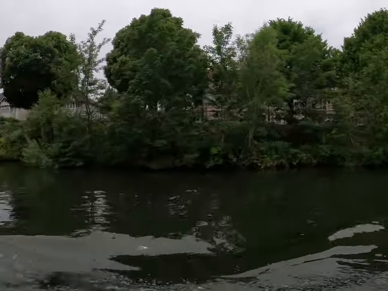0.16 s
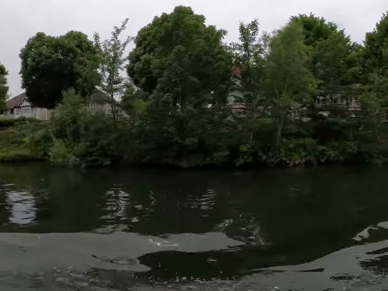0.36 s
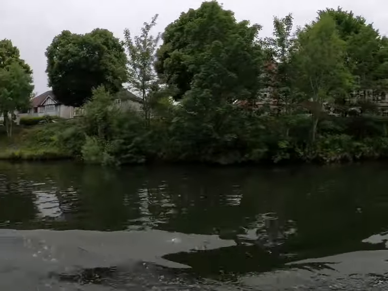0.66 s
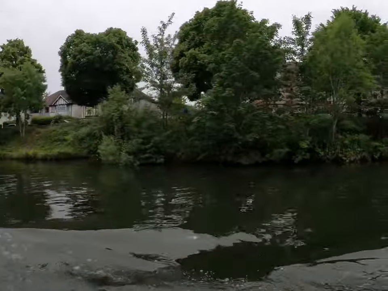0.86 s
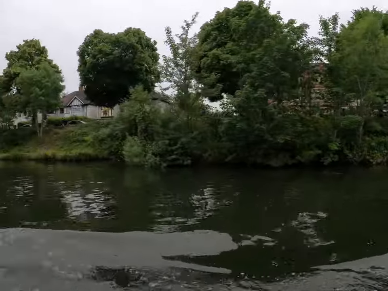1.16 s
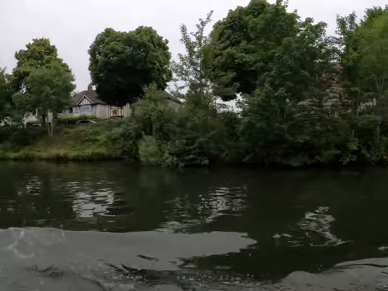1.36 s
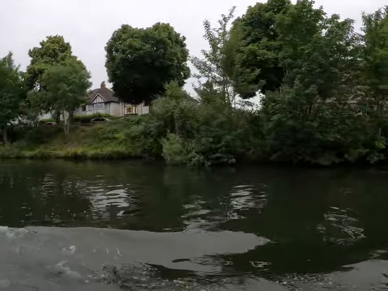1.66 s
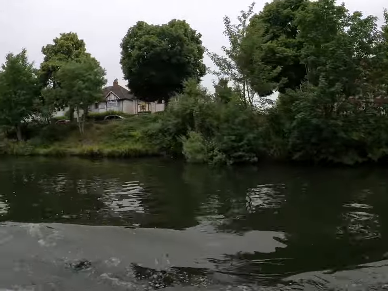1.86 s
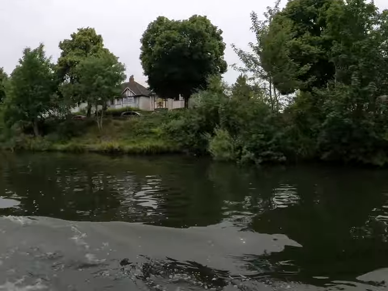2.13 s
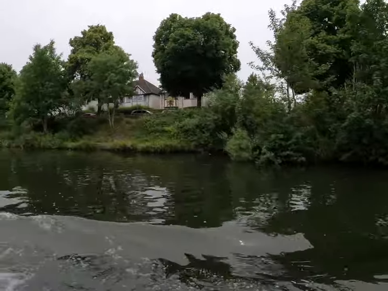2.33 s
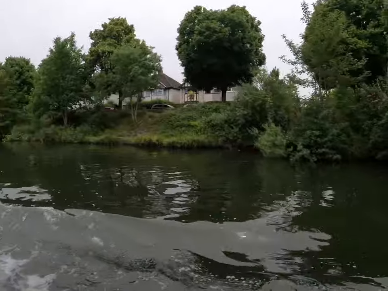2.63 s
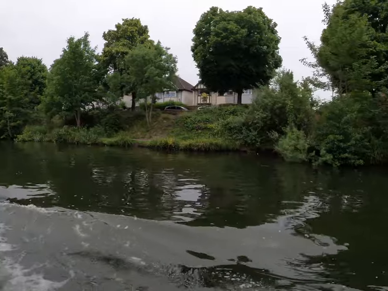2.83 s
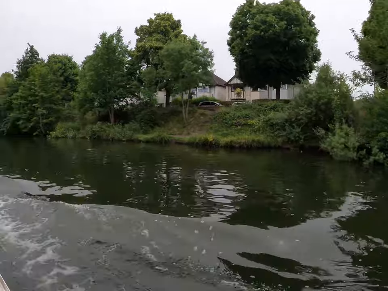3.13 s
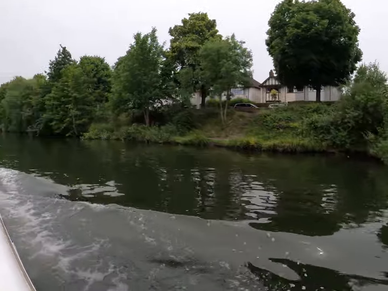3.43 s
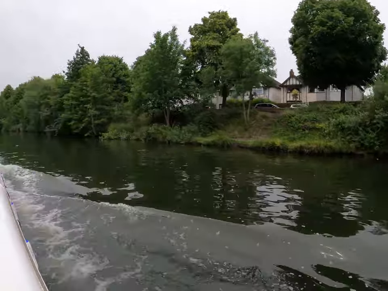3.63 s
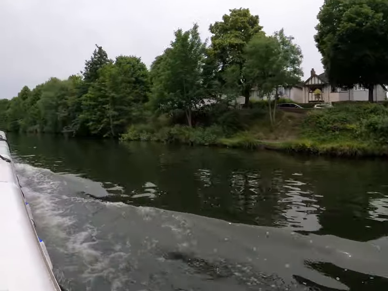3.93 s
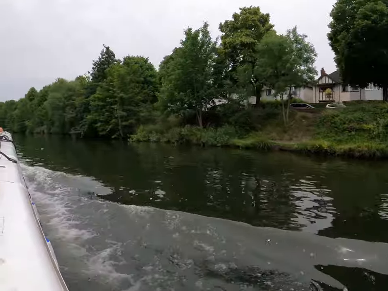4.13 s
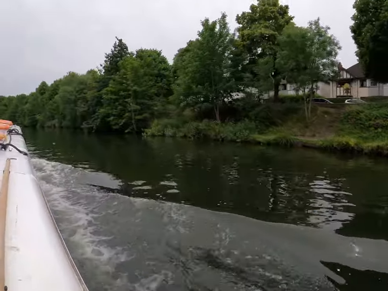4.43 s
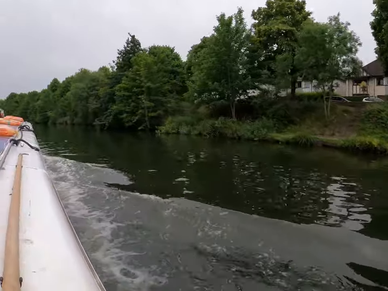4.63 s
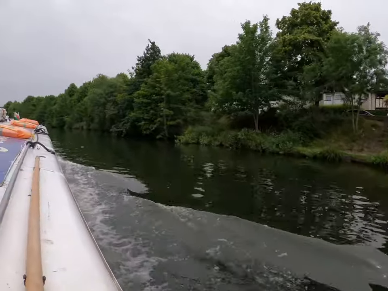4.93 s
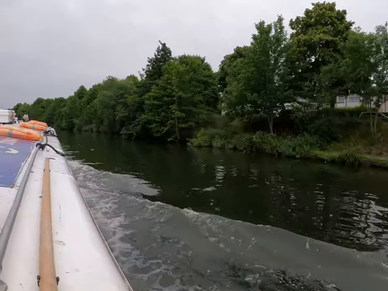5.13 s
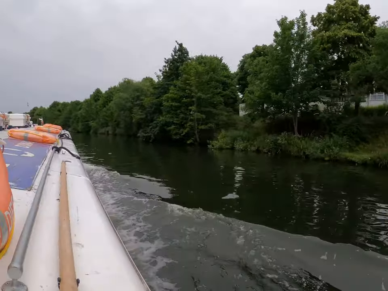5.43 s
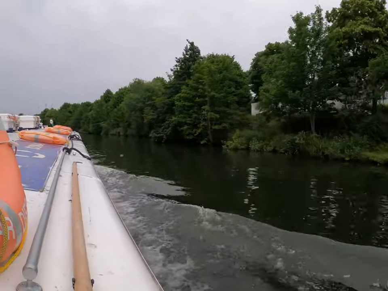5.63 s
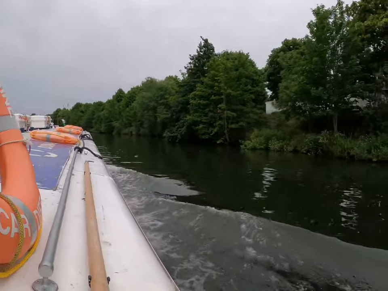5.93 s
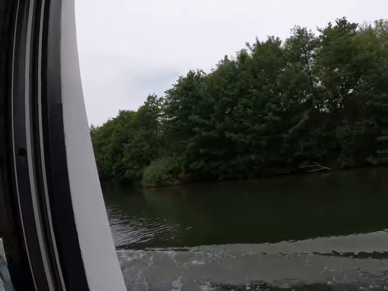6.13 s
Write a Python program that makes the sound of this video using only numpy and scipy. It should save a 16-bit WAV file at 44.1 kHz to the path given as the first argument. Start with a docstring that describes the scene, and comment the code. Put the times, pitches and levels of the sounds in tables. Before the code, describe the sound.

A boat diesel hums deep and steady on a river while wind buffets the microphone early on and the wake hisses softly past the hull.

```python
"""A four-cylinder boat diesel hums at steady speed on a calm river: cosines on multiples of its cycle.
Gear and block tones whine over the firing tone; engine roar is noise throbbing with firing and cycle.
The wake is lumpy noise plus ringing bubbles; soft swells and drops are short bands of noise.
Wind rumbles, flutters and buffets as enveloped noise; the deck drums as steady low noise.
The microphone turns from the bank to the stern, which shifts gear, wake and roar levels."""
import sys
import numpy as np
from scipy import signal
from scipy.fft import rfft, irfft
from scipy.io import wavfile
from scipy.ndimage import uniform_filter1d

SR = 44100
rng = np.random.default_rng(int(sys.argv[2]) if len(sys.argv) > 2 else 0)


def bounce(signal):
    """Save signal as a 16-bit WAV file at the path given by the first command-line argument."""
    frames = np.transpose(np.atleast_2d(signal))
    limited = np.clip(frames, -1, 1)
    pcm = np.round(limited * 32767).astype(np.int16)
    wavfile.write(sys.argv[1], SR, pcm)


def to_linear_factor(level_db):
    """Convert decibel levels (scalar or array-like) to linear amplitude factors."""
    exponent = np.asarray(level_db, float) / 20
    return 10 ** exponent


N = 276990
STOP_S = 6.0583

# deck drumming: f/Hz, density/dB (all spectra are relative; the noise is scaled to rms 1)
HULL_SPECTRUM = [(12, -14.5), (30, 0), (60, -6.5), (110, -6.5), (180, -15.5), (300, -28)]
# wind and buffet rumble: f/Hz, density/dB
RUMBLE_SPECTRUM = [(12, -10), (25, 1), (50, -0.5), (90, 4), (140, 0.5), (250, -31.5), (400, -50.5)]
# steady wind, duller than its gusts: f/Hz, density/dB
BREEZE_SPECTRUM = [(60, -30.5), (110, -2.5), (170, -1.5), (240, -2.5), (330, -6), (500, -16), (900, -28),
                   (1500, -41), (2500, -61)]
# buffet flutter: f/Hz, density/dB
FLUTTER_SPECTRUM = [(60, -30), (110, -4), (200, -0.5), (320, -2.5), (500, -13.5), (900, -26), (1500, -39.5),
                    (2500, -63)]
# buffet rasp: f/Hz, density/dB
RASP_SPECTRUM = [(250, -19), (400, 10), (700, 7), (1100, -2.5), (1500, -15), (2000, -28.5), (2800, -56)]
# splashes in the wake: f/Hz, density/dB
SPLASH_SPECTRUM = [(900, -29), (1500, -5.5), (2200, -3.5), (2800, -6), (3600, -14.5), (5000, -24.5),
                   (7000, -38.5)]
# fine foam: f/Hz, density/dB
FOAM_SPECTRUM = [(2500, -16), (3600, -3.5), (4500, -3), (6000, -7), (7500, -10.5), (9000, -15.5),
                 (11000, -25), (14000, -51)]
# rough engine and exhaust noise: f/Hz, density/dB
ROAR_SPECTRUM = [(150, -20.5), (300, -14.5), (420, 1), (520, -4.5), (600, -7.5), (700, -4), (800, -6),
                 (1000, -8.5), (1300, -11.5), (1800, -20), (3000, -42.5)]
# microphone hiss: f/Hz, density/dB
MIC_SPECTRUM = [(5000, -22.5), (7500, -6.5), (8500, -2.5), (10000, -14.5), (12000, -21.5), (15500, -38)]
HULL_DB, MIC_HISS_DB = -33, -70

# microphone direction: t/s, heading (0 bank to 1 stern)
HEADING = [(0, 0.0091), (2.9, 0.065), (3.5, 0.29), (4.1, 0.35), (4.45, 0.52), (4.95, 0.94), (6.1, 0.99)]
SIDE_HEADING = 0.4  # facing along the side
# swell shared by wake, roar and gear, before each one's share: t/s, level/dB
SWELL_DB = [(0, -3), (.12, 0.5), (.45, 0.5), (.68, 2), (1.0, 0.5), (1.35, -1), (1.7, 1.5), (2.65, 2),
            (3.0, 0.9), (3.45, -2), (4.75, -2), (4.95, 3), (5.15, 2.1), (5.6, 1.5), (5.85, 0), (6.05, 1.5)]
GEAR_SHARE, SPLASH_SHARE, FOAM_SHARE, ROAR_SHARE = 0.47, 0.98, 0.9, 1.2
SPLASH_DB, FOAM_DB, ROAR_DB = -50, -60.5, -38.5  # base levels
SPLASH_STERN_DB, FOAM_STERN_DB, ROAR_STERN_DB = -3, -0.3, -1.36  # change when facing the stern

# wind on the microphone: t/s, rumble level/dB, flutter level/dB
WIND_DB = [(0, -17.5, -28), (.1, -28, -25.5), (.28, -18.5, -21.5), (.36, -28.5, -31.5), (.5, -31.5, -30.5),
           (.6, -30, -31), (.8, -24, -28.5), (1.05, -21, -24), (1.25, -25, -43), (1.55, -24.5, -33),
           (1.9, -30.5, -37.5), (2.6, -41, -31), (3.2, -48, -31), (3.9, -27, -32.5), (4.4, -29, -38),
           (4.9, -34.5, -33), (5.3, -30.5, -36), (6.05, -29, -40)]
# stronger wind is lumpier
RUMBLE_CALM_DB, LUMPS_CALM_DB, LUMPS_DB_PER_DB = -44, 0.4, 0.09
# wind buffets: t/s, thump level/dB, flutter level/dB, rasp level/dB, length/s
BUFFETS = [(0.089, -40.5, -20.5, -31.5, 0.017), (0.113, -48.5, -23.5, -26, 0.035),
           (0.154, -50, -26, -29, 0.048), (0.196, -22, -19.5, -32.5, 0.042),
           (0.248, -26.5, -25.5, -24, 0.017), (0.267, -31, -16, -21, 0.013), (0.288, -32, -19, -27, 0.042),
           (0.349, -46, -38, -24.5, 0.013), (0.373, -52.5, -33.5, -32, 0.031),
           (0.648, -12, -12, -37, 0.0053), (0.661, -30, -15.5, -42, 0.011),
           (0.719, -40, -17.5, -19.5, 0.012), (0.741, -44, -21, -37, 0.008),
           (0.782, -27, -21.5, -25, 0.016), (0.816, -40, -16.5, -31, 0.013),
           (0.839, -40.5, -16.5, -30, 0.012), (0.854, -37, -23, -29, 0.0089), (0.901, -37, -19, -33, 0.021),
           (0.919, -24, -19, -34, 0.0068), (0.926, -30, -28.5, -18.5, 0.007),
           (0.984, -14.5, -17, -27, 0.019), (1.001, -20, -22, -39, 0.02), (1.034, -37, -24, -38, 0.013),
           (1.088, -35, -30, -41, 0.017), (1.125, -18.5, -22.5, -38, 0.017),
           (1.146, -22, -21.5, -39, 0.012), (1.201, -23, -17, -25, 0.012), (1.337, -50, -20, -33, 0.0071),
           (1.349, -53, -23, -25, 0.012), (1.53, -22.5, -53, -49, 0.011), (1.674, -30, -41, -47, 0.022),
           (1.77, -43, -23.5, -44, 0.018), (1.791, -37, -19, -26, 0.014), (1.835, -17, -32, -40, 0.074),
           (2.121, -35, -27, -32, 0.0156), (2.232, -46, -27.5, -32, 0.013), (2.327, -21.5, -27, -38, 0.046),
           (3.87, -35, -48, -54.5, 0.03), (4.342, -25, -56, -51, 0.066), (4.743, -25, -64, -57, 0.058),
           (4.869, -14.5, -26, -39, 0.02), (4.832, -15.5, -41, -48, 0.0098),
           (4.917, -13.5, -24, -39, 0.032), (5.676, -30, -39, -47, 0.03), (5.973, -45.5, -38, -33, 0.0086)]
DIP_FROM_DB, DIP_DB_PER_DB = -27, 0.29  # thumps above this level push the hum down
# further brief dips of the hum: t/s, depth/dB, length/s
DIPS = [(0.78, 4, .02), (0.98, 4, .02), (1.08, 5, .03), (1.12, 6, .025), (3.876, 6, .02), (4.36, 3, .025),
        (4.748, 4, .014), (4.92, 5, .018), (5.674, 12, .014)]

# soft swells of band noise, dull to bright, in wind and water: t/s, centre f/Hz, level/dB, length/s
SOFT_SWELLS = [(0.47, 2700, -59, 0.072), (0.668, 2800, -47, 0.06), (2.4, 2245, -53.5, 1),
               (5.8, 2100, -63, 0.26), (5.521, 3000, -54, 0.1), (5.597, 3200, -49.5, 0.03),
               (3.2, 3500, -60, 0.45), (5.05, 5500, -63.5, 0.4), (2.75, 8500, -70, 0.6),
               (4.89, 12000, -74.5, 0.07), (5.08, 9000, -69.5, 0.2), (5.0, 2600, -52, 0.1),
               (5.4, 2700, -58.5, 0.37), (0.24, 1200, -43, 0.19), (0.9, 1400, -48, 0.23),
               (2.9, 2000, -57, 0.33), (5.35, 1650, -51, 0.5), (2, 1400, -47, 0.12)]
# spray drops close by: t/s, peak level/dB, lowest f/Hz, highest f/Hz
DROPS = [(0.099, -61.5, 8000, 15500), (0.11, -62, 8000, 15500), (0.154, -68.5, 8000, 14000),
         (0.176, -68, 8000, 14000), (3.3294, -53, 2980, 7000), (3.555, -55, 5500, 10500),
         (4.4096, -53, 5500, 10500), (5.9325, -45, 1800, 8600), (3.095, -58, 6000, 9500),
         (3.606, -69, 10000, 14040)]

CYCLE_HZ = 16.864
# firing tone, rising slightly and then steady: t/s, level/dB
FIRING_DB = [(0, -15.5), (1, -16.5), (2.3, -14.5), (3.2, -13.5), (3.8, -13.5), (6.1, -13.5)]
# exhaust overtones: multiple of the firing tone, level re firing tone/dB
OVERTONES = [(2, -14), (3, -25.5)]
# lowest gear tone: t/s, level/dB
GEAR_LOW_DB = [(0, -33), (1.0, -36), (1.4, -39.5), (1.8, -43), (2.1, -35), (3.9, -35), (4.15, -44),
               (4.5, -40), (6.1, -38)]
GEAR_LOW_ORDER = 14  # teeth a cycle
# higher gear tones: multiple of the cycle
GEAR_ORDERS = [28, 42, 46, 56, 70]
# a row per gear order, before swell: level to bank/dB, level along side/dB, level to stern/dB
GEAR_DB = [(-40.5, -42, -37), (-48.5, -45.5, -51), (-45.5, -48.5, -48), (-53, -57, -46), (-57, -60, -53.5)]
# weaker tones of block, valves and hull: multiple of the cycle
BLOCK_ORDERS = [7, 15, 17, 18, 19, 20, 21, 23, 24, 26, 27, 31, 37, 39, 45, 51, 53, 55, 57, 60, 65, 84, 98,
                126, 140]
# one per block order: level/dB
BLOCK_DB = [-43, -45, -48, -51, -50, -54, -53, -52, -52, -50, -52, -55, -61, -60, -58, -54, -54, -56, -52,
            -63, -64, -64, -67, -68, -70]


def rms_one(x):
    """Scale to unit power."""
    return x / np.sqrt(np.mean(x ** 2) + 1e-20)


def in_time(rows):
    """Interpolate each column of a curve at every sample."""
    s, *columns = np.transpose(rows)
    return [np.interp(np.arange(N) / SR, s, c) for c in columns]


def drift(rate_hz):
    """Slow chance: noise at SR / 40 through a double one-pole low-pass; spread 1."""
    r = np.exp(-80 * np.pi * rate_hz / SR)
    sparse = rng.standard_normal(N // 40 + 2002)
    slow = signal.lfilter([1], [1, -2 * r, r * r], sparse)[2000:]  # settled part
    return np.interp(np.arange(N) / 40, np.arange(len(slow)), rms_one(slow - slow.mean()))


def bell_at(centre_s, length_s):
    """Gaussian envelope, peak 1, standard deviation half the length."""
    t = np.arange(N) / SR
    return np.exp(-0.5 * ((t - centre_s) / (length_s / 2)) ** 2)


def coloured(x, spectrum):
    """Give x the spectrum, interpolated over log frequency; rms 1."""
    hz, db = np.transpose(spectrum)
    log_hz = np.log(np.arange(N // 2 + 1) * SR / N + 1)
    gain = to_linear_factor(np.interp(log_hz, np.log(hz), db, left=-90, right=-90))
    return rms_one(irfft(rfft(x) * gain, N))


def noise(spectrum, lumpy_db, lump_rate_hz):
    """Coloured noise that comes in lumps."""
    return coloured(rng.standard_normal(N) * to_linear_factor(lumpy_db * drift(lump_rate_hz)), spectrum)


def even(spectrum, hold_s):
    """Coloured noise with its own swells evened out, so that a short gust always sounds."""
    x = coloured(rng.standard_normal(N), spectrum)
    power = uniform_filter1d(x ** 2, size=round(hold_s * SR))
    return rms_one(x / np.sqrt(power + 0.05))


def hull():
    """The deck drums steadily: low coloured noise."""
    return to_linear_factor(HULL_DB) * coloured(rng.standard_normal(N), HULL_SPECTRUM)


def wind():
    """Wind on the microphone: rumble, and a flutter that is lumpier as the rumble strengthens."""
    rumble_db, flutter_db = in_time(WIND_DB)
    lumps_db = np.maximum(LUMPS_CALM_DB + LUMPS_DB_PER_DB * (rumble_db - RUMBLE_CALM_DB), 0)
    rumble = to_linear_factor(rumble_db) * noise(RUMBLE_SPECTRUM, lumpy_db=0.5, lump_rate_hz=4.6)
    breeze = coloured(rng.standard_normal(N), BREEZE_SPECTRUM)
    return rumble + to_linear_factor(flutter_db + lumps_db * drift(30.0)) * breeze


def buffets():
    """Gusts thump evenly, flutter and rasp with a fast rise and slower fall; also returns hum dip/dB."""
    t = np.arange(N) / SR
    dip_db, thump, flutter, rasp = np.zeros((4, N))
    for s, thump_db, flutter_db, rasp_db, length_s in BUFFETS:
        bell = bell_at(s, length_s)
        burst = np.where(t < s, bell ** 4.0, bell ** 1.13)
        dip_db += DIP_DB_PER_DB * np.maximum(thump_db - DIP_FROM_DB, 0) * bell
        thump += to_linear_factor(thump_db) * bell
        flutter += to_linear_factor(flutter_db) * burst
        rasp += to_linear_factor(rasp_db) * burst ** 2
    for s, depth_db, length_s in DIPS:
        dip_db += depth_db * bell_at(s, length_s)
    sound = thump * even(RUMBLE_SPECTRUM, 0.04)
    sound += flutter * even(FLUTTER_SPECTRUM, 0.012)
    sound += rasp * even(RASP_SPECTRUM, 0.006)
    return dip_db, sound


def soft_swells():
    """Soft swells of band noise, dull to bright, in wind and water; each in one broad resonance."""
    white, out = rng.standard_normal(N), np.zeros(N)
    for s, hz, db, length_s in SOFT_SWELLS:
        band = signal.butter(2, [hz / 1.2, hz * 1.2], "band", fs=SR, output="sos")
        out += to_linear_factor(db) * bell_at(s, length_s) * rms_one(signal.sosfilt(band, white))
    return out


def drops():
    """Short splats: bursts of random signs, each in its own band."""
    rise_s, fade_s = 0.0005, 0.0015
    t, signs, out = np.arange(N) / SR, rng.choice([-1., 1.], N), np.zeros(N)
    for s, db, low_hz, high_hz in DROPS:
        age_s = np.maximum(t - s, 0)
        burst = to_linear_factor(db) * (1 - np.exp(-age_s / rise_s)) * np.exp(-age_s / fade_s)
        band = signal.butter(4, [low_hz, min(high_hz, 0.4 * SR)], "band", fs=SR, output="sos")
        out += burst * rms_one(signal.sosfilt(band, signs))
    return 2 * out  # the envelope alone peaks near 0.5


def bubbles():
    """Bursting bubbles: random impulses into 14 resonators that decay 60 dB in 9 cycles; rms 1."""
    sizes = to_linear_factor(3.7 * np.minimum(rng.exponential(1, N), 5)) * rng.choice([-1, 1], N)
    born = rng.random(N) < 900.0 * to_linear_factor(3.0 * drift(6.0)) / SR  # around 900 per second
    dealt, fizz = rng.integers(0, 14, N), np.zeros(N)
    for k, hz in enumerate(np.geomspace(1300, 9000, 14)):
        r, w = to_linear_factor(-60 * hz / (9.0 * SR)), 2 * np.pi * hz / SR
        hits = sizes * born * (dealt == k) + 1e-18
        fizz += np.sqrt(hz) * signal.lfilter([np.sin(w)], [1, -2 * r * np.cos(w), r * r], hits)
    return rms_one(fizz)


def wake(heading, swell_db):
    """Lumpy hiss with bubbles, coloured as splashes below and fine foam above."""
    splash_db = SPLASH_DB + SPLASH_SHARE * swell_db + SPLASH_STERN_DB * heading
    foam_db = FOAM_DB + FOAM_SHARE * swell_db + FOAM_STERN_DB * heading
    hiss = rng.standard_normal(N) * to_linear_factor(0.34 * drift(25.0) + 0.6 * drift(5.5))
    hiss += to_linear_factor(-15.0) * bubbles()
    return to_linear_factor(splash_db) * coloured(hiss, SPLASH_SPECTRUM) + to_linear_factor(foam_db) * coloured(hiss, FOAM_SPECTRUM)


def roar(heading, swell_db):
    """Rough engine and exhaust noise, throbbing a little with each firing and each cycle."""
    turn = 2 * np.pi * CYCLE_HZ * np.arange(N) / SR
    level_db = ROAR_DB + ROAR_SHARE * swell_db + ROAR_STERN_DB * heading
    throb_db = 0.7 * np.cos(4 * turn) + 1.4 * np.cos(turn)
    return to_linear_factor(level_db + throb_db) * noise(ROAR_SPECTRUM, lumpy_db=0.9, lump_rate_hz=20.0)


def gear_and_block(heading, swell_db):
    """Tones on multiples of the cycle, wavering in level and phase, high ones more than low ones."""
    turn = 2 * np.pi * CYCLE_HZ * np.arange(N) / SR
    sway = 0.01 * drift(1.5)  # rad: the governor hunts slightly
    gear_db = [np.interp(heading, [0, SIDE_HEADING, 1], row) + GEAR_SHARE * swell_db for row in GEAR_DB]
    orders = [GEAR_LOW_ORDER] + GEAR_ORDERS + BLOCK_ORDERS
    levels_db = in_time(GEAR_LOW_DB) + gear_db + BLOCK_DB
    out = np.zeros(N)
    for order, db in zip(orders, levels_db):
        start = rng.uniform(0, 2 * np.pi)
        waver = np.sqrt(order / 40)
        phase = order * (turn + sway) + start + 0.12 * waver * drift(6.0)
        out += to_linear_factor(db + 0.8 * waver * drift(2.5)) * np.cos(phase)
    return np.sqrt(2) * out  # levels are rms


def firing_hum(dip_db):
    """Firing tone, four per cycle, with exhaust overtones; the level wavers and dips."""
    turn = 2 * np.pi * CYCLE_HZ * np.arange(N) / SR
    firing = np.cos(4 * turn)
    for multiple, db in OVERTONES:
        lag = np.pi / 2 * (multiple - 1) ** 1.45  # the pipe delays overtones: the wave tilts like a saw
        firing += to_linear_factor(db + 0.8 * drift(3.0)) * np.cos(multiple * 4 * turn - lag)
    level_db = in_time(FIRING_DB)[0] + 0.21 * drift(36.0) - dip_db
    return np.sqrt(2) * to_linear_factor(level_db) * firing


def scene():
    """Sum hull, wind, water and engine."""
    (swell_db,), (heading,) = in_time(SWELL_DB), in_time(HEADING)
    dip_db, gusts = buffets()
    air = wind() + gusts + soft_swells()
    water = drops() + wake(heading, swell_db)
    engine = roar(heading, swell_db) + gear_and_block(heading, swell_db) + firing_hum(dip_db)
    return (hull() + air + water + engine)[None]


def top_cut(x):
    """Nothing passes above the cut-off."""
    return signal.sosfilt(signal.butter(12, 15710, fs=SR, output="sos"), x)


def record(dry):
    """The microphone hisses faintly, peaks are rounded and the sound stops dead shortly before the end."""
    hiss = to_linear_factor(MIC_HISS_DB) * coloured(rng.standard_normal(N), MIC_SPECTRUM)
    rounded = 0.7 * np.tanh((dry + hiss) / 0.7)
    gate = np.clip((STOP_S - np.arange(N) / SR) / 0.0001, 0, 1)
    return top_cut(rounded * gate)


dry = scene()
out = record(dry)
bounce(out)
```